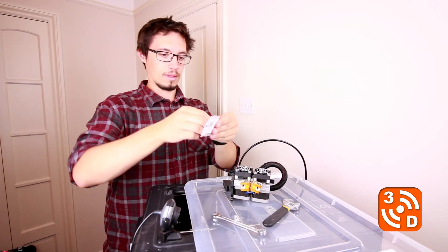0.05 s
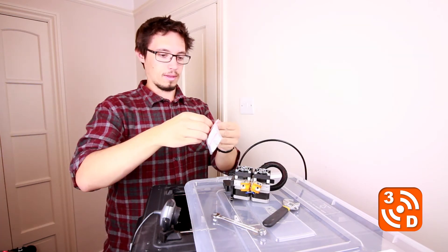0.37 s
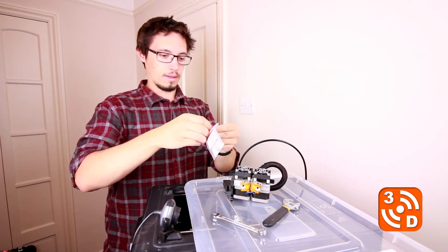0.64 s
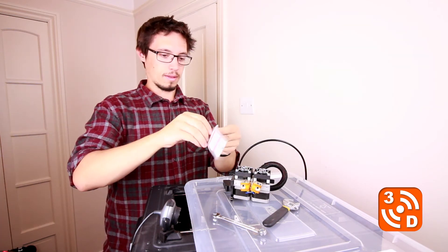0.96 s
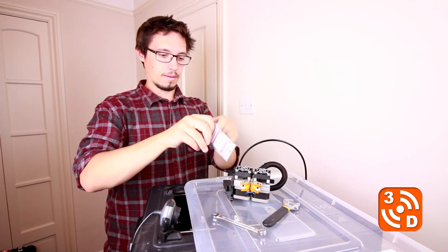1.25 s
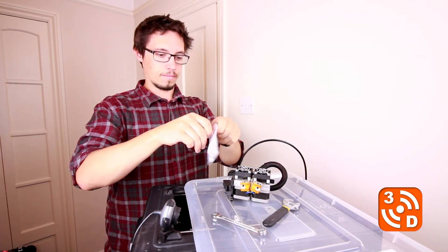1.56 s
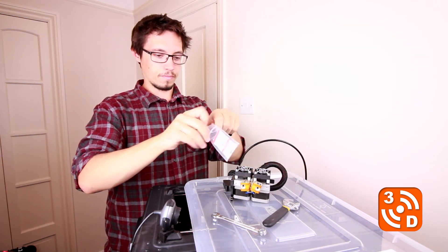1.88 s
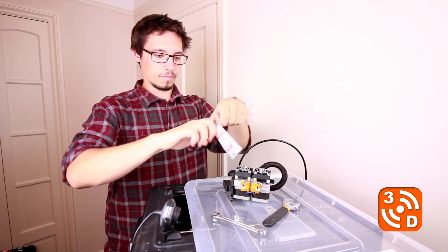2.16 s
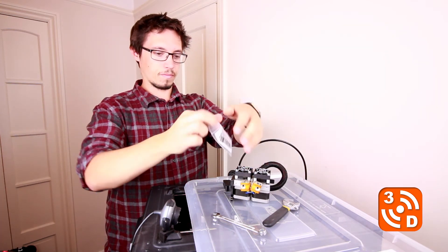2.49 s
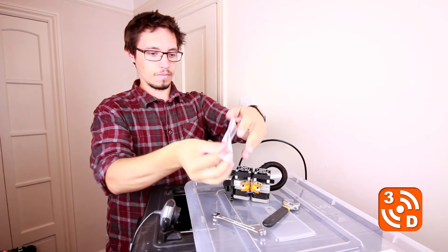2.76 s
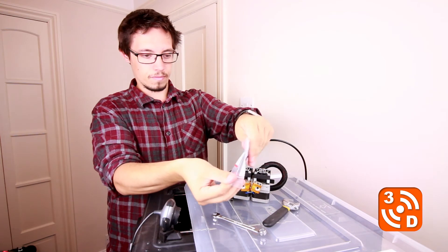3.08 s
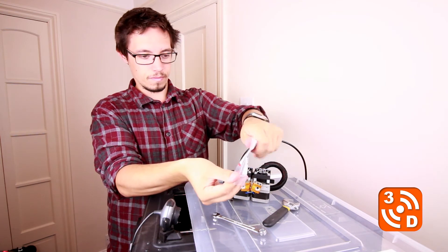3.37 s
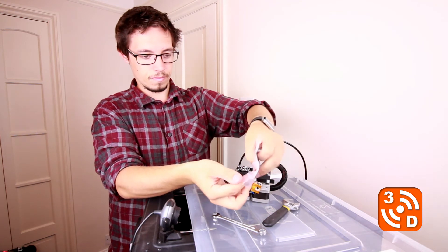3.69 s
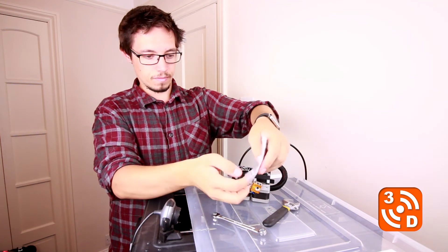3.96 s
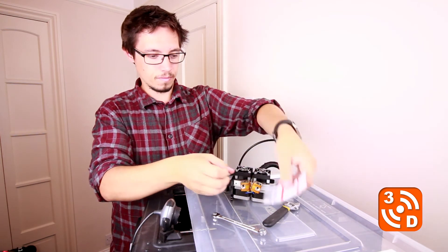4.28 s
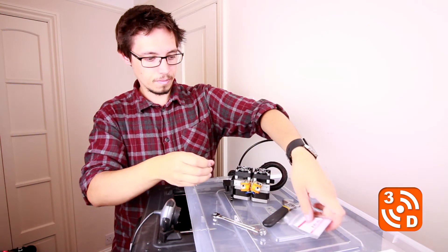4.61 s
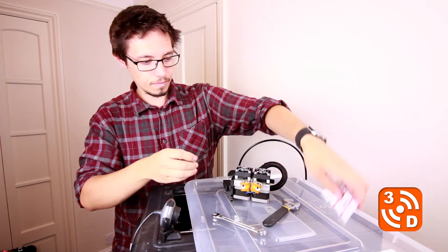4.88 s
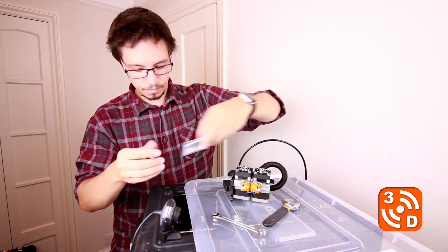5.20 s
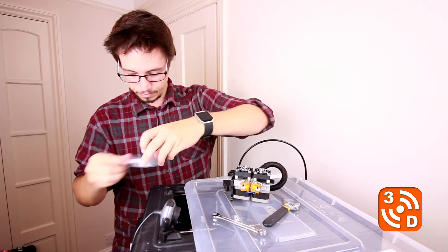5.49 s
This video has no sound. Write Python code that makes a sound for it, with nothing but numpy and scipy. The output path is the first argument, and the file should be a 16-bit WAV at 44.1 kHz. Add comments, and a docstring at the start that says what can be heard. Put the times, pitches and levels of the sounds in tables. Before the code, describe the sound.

A small plastic packet crinkles and snaps as fingers pick it open, then a hand softly bumps a plastic box lid.

```python
"""A small room, one microphone; low rumble and faint hiss throughout.
Fingers pick open a small plastic packet: the film rustles under each stroke, buckles in sharp snaps
and drags in short scrunches. Loudest from 0.9 to 2.6 s; from 1.75 s the packet also jerks with soft thuds.
At 4.7 s the hand with the packet bumps the lid of a plastic storage box, then lifts the packet
and crinkles it again at 5.5 s."""
import sys
import numpy as np
from scipy import signal
from scipy.fft import rfft, irfft, next_fast_len
from scipy.io import wavfile
from scipy.ndimage import map_coordinates

SR = 44100
rng = np.random.default_rng(int(sys.argv[2]) if len(sys.argv) > 2 else 0)


def store_wav(level_fs):
    """Save 16-bit WAV to argv[1]."""
    pcm = np.round(np.clip(np.atleast_2d(level_fs), -1, 1) * 32767)
    wavfile.write(sys.argv[1], SR, pcm.T.astype(np.int16))


N = 249076


def amp(db):
    """Decibels to gain."""
    return 10 ** (np.asarray(db) / 20)


def unit(x):
    """Scale to rms 1."""
    return x / np.sqrt(np.mean(x ** 2) + 1e-20)


def along(points, hz):
    """Interpolate (freq_hz, value) points on a log axis."""
    freqs_hz, values = np.transpose(points)
    return np.interp(np.log(hz + 1), np.log(freqs_hz + 1), values)


def curve(rows):
    """Interpolate (time_s, value) rows, one value per sample."""
    return np.interp(np.arange(N) / SR, *np.transpose(rows))


def wobble(rate_hz):
    """Smooth random curve, rate_hz knots a second."""
    knots = rng.standard_normal(int(N * rate_hz / SR) + 4)
    return map_coordinates(knots, [np.arange(N) * rate_hz / SR])


def filtered(x, response):
    """Apply a frequency response, given as a function of hz."""
    size = next_fast_len(len(x) + SR // 2)
    return irfft(rfft(x, size) * response(np.fft.rfftfreq(size, 1 / SR)), size)[:len(x)]


def coloured(x, spectrum):
    """Shape x by (freq_hz, gain_db) points; rms 1."""
    return unit(filtered(x, lambda hz: amp(along(spectrum, hz))))


def minimum_phase(gain):
    """The most sudden impulse response with this gain."""
    cepstrum = irfft(np.log(np.maximum(gain, 1e-6)))
    half = len(cepstrum) // 2
    fold = np.r_[1, np.full(half - 1, 2), 1, np.zeros(half - 1)]
    return irfft(np.exp(rfft(cepstrum * fold)))


def add(track, start_s, sound):
    """Mix a sound into the track."""
    part = track[max(0, round(start_s * SR)):][:len(sound)]
    part += sound[:len(part)]


# room decay: freq_hz, t60_s
ROOM_DECAY = [(300, 0.57), (800, 0.13), (1400, 0.2946), (2200, 0.2836), (4500, 0.2657), (8000, 0.18),
              (15000, 0.2)]
# room colour: freq_hz, gain_db
ROOM_SPECTRUM = [(200, -2), (500, -4), (1000, 2.5), (1450, 1.5), (2000, -3.5), (2900, 1.5), (4000, -3.5),
                 (5000, -0.5), (9000, -1), (15000, 1)]

def room_tail(build_s=0.0026):
    """Diffuse tail of energy 1: builds as the nearest surfaces reply; the bass lasts longest."""
    hz, t, noise = signal.stft(rng.standard_normal(SR // 2), SR, nperseg=256)
    gain = amp(along(ROOM_SPECTRUM, hz)[:, None] - 60 * t / along(ROOM_DECAY, hz)[:, None])
    tail = signal.istft(noise * gain, SR, nperseg=256)[1]
    tail *= 1 - np.exp(-(np.arange(len(tail)) / SR / build_s) ** 2)
    return tail / np.linalg.norm(tail)


def in_room(x, wet_db):
    """Direct sound plus its own room tail."""
    wet = amp(wet_db) * signal.fftconvolve(x, room_tail())
    return wet + np.pad(x, (0, len(wet) - len(x)))


# background spectra: freq_hz, density_db
RUMBLE_SPECTRUM = [(4, -16), (8, 3), (14, -7.5), (20, -18), (30, -24.5), (48, -27), (70, -35), (120, -33),
                   (200, -88)]
HISS_SPECTRUM = [(60, -80.5), (130, -0.5), (200, 2.5), (290, -0.5), (400, -9), (650, -13), (1000, -13),
                 (1350, -13.5), (2000, -23.5), (3000, -32.5), (8000, -33.5), (16000, -36.5)]
# rumble drift: time_s, gain_db
RUMBLE_DRIFT = [(0, 7.5), (0.7, 2), (1.3, 1), (1.6, 4.5), (3.0, 3.5), (4.2, 0.5), (5.15, 1), (5.64, 10.5)]

def background(rumble_db=-41, hiss_db=-57):
    """Deep, slowly changing rumble and the steady hush of the room."""
    rumble = coloured(rng.standard_normal(N), RUMBLE_SPECTRUM + [(400, -120)])
    hiss = coloured(rng.standard_normal(N), HISS_SPECTRUM)
    return amp(rumble_db + curve(RUMBLE_DRIFT)) * rumble + amp(hiss_db) * hiss


# rubbed film: freq_hz, density_db
FILM_SPECTRUM = [(180, -42.5), (300, -3.5), (689, 4.5), (1480, 6), (1750, 1.5), (2280, -0.5), (2980, -6),
                 (4910, -2), (5430, -4.5), (13800, -12.5), (16000, -19)]
# finger strokes: peak_s, length_s, level_db, taut_db (slack film is dull, taut film bright)
FINGER_STROKES = [(0.1, 0.068, -64, 1), (0.208, 0.041, -63.5, 2), (0.413, 0.036, -52, -0.5),
                  (1.118, 0.05, -55.5, 12), (1.175, 0.038, -60, 10), (1.3, 0.17, -64, 10),
                  (1.51, 0.14, -69.5, -2), (2.06, 0.22, -48, 2), (2.2, 0.067, -44.5, 4.5),
                  (2.35, 0.063, -61, 2), (2.486, 0.067, -47.5, 0.5), (2.64, 0.1, -54.5, -5),
                  (2.914, 0.041, -52.5, -9), (3.005, 0.052, -55.5, 5), (3.127, 0.058, -55, 3.5),
                  (3.22, 0.044, -56, 9), (3.335, 0.043, -57.5, 7), (3.46, 0.36, -66, 0.5),
                  (3.589, 0.042, -50.5, -15), (3.703, 0.091, -45, 0), (3.79, 0.079, -55.5, 6),
                  (3.92, 0.042, -60, 0), (4.06, 0.072, -57.5, 3), (4.2, 0.075, -63.5, 25),
                  (4.287, 0.037, -55, 8), (4.57, 0.11, -60, 1), (4.673, 0.054, -49.5, 1.5),
                  (4.78, 0.098, -55.5, -5), (5.09, 0.11, -67.5, 4), (5.201, 0.06, -66, 5),
                  (5.524, 0.049, -47.5, 10)]

def rustle(creases_per_s=600, spread_db=4, slide_db=-2, pivot_hz=3000, hold_db=-71.5, catch_db=2):
    """Tiny uneven creases tick over the hiss of skin sliding on film; each stroke swells and fades."""
    t = np.arange(N) / SR
    sizes = amp(spread_db * np.minimum(rng.exponential(size=N), 3)) * rng.choice([-1, 1], N)
    ticks = unit(sizes * (rng.random(N) < creases_per_s / SR))
    film = coloured(ticks + amp(slide_db) * rng.standard_normal(N), FILM_SPECTRUM)
    dull = filtered(film, lambda hz: 1 / (1 + (hz / pivot_hz) ** 2))
    bright = film - dull
    out = amp(hold_db) * film  # packet merely held
    for peak_s, length_s, level_db, taut_db in FINGER_STROKES:
        pressure = np.exp(-((t - peak_s) / (length_s / 2)) ** 2)
        out += amp(level_db) * pressure * unit(dull * amp(-taut_db) + bright * amp(taut_db))
    catch = amp(catch_db * wobble(rate_hz=90))  # skin catches and lets go
    return in_room(catch * out, wet_db=-4)[:N]


# base slope of a snap, and the packet's resonances: freq_hz, gain_db
SNAP_SPECTRUM = [(100, -7.5), (300, -5.5), (450, 2.5), (800, 1), (1300, 1), (2400, 1), (5000, 0.5),
                 (11000, -7), (16000, -15)]
PACKET_RESONANCES = [(600, -0.5), (1200, 3.5), (1700, -0.5), (2120, 5), (2600, -3), (3150, -2), (4200, 1.5),
                     (5700, 0), (7400, 0), (8600, 2), (10000, 0)]
# reach of bass_db and bright_db: freq_hz, share
BASS_WEIGHT = [(450, 1), (800, 0.58), (1300, 0)]
BRIGHT_WEIGHT = [(1300, 0.1), (2400, 0.37), (5000, 0.86), (11000, 1.05)]

def snap_colour_db(hz, bass_db, bright_db, facet_hz, air_hz=7440, air_db_per_octave=4, neutral_hz=3700):
    """Spectrum of one snap; a smaller, higher facet cracks more sharply, with more air on top."""
    base_db = along(SNAP_SPECTRUM, hz) + along(PACKET_RESONANCES, hz)
    tone_db = bass_db * along(BASS_WEIGHT, hz) + bright_db * along(BRIGHT_WEIGHT, hz)
    air_shelf = hz ** 4 / (hz ** 4 + air_hz ** 4)
    return base_db + tone_db + air_db_per_octave * np.log2(facet_hz / neutral_hz) * air_shelf


# film buckles: start_s, level_db, facet1_hz, facet2_hz, bass_db, bright_db, room_db
BUCKLES = [(0.1172, -52, 2200, 4400, 18, 7, -3.5), (0.3698, -50.5, 2760, 4300, -1, 1, -9),
           (0.3962, -36.5, 2140, 5260, -19, 7, -2.5), (0.4128, -39, 1430, 2170, -18, 5.5, -2),
           (0.53, -57, 1120, 5470, 20, 7, -12), (0.6673, -50.5, 1300, 4440, -5, 1, -5),
           (0.857, -53.5, 3300, 6000, -17, 3, 1), (0.881, -43.5, 4150, 6420, -16, 5, 1.5),
           (0.893, -41, 4270, 5680, -4, 3, -6), (0.8985, -39.5, 1450, 5930, -20, 0, -12),
           (0.9223, -20.5, 1490, 4720, -17, -4, -6), (1.224, -34.5, 4400, 6050, 7, 17.5, 6.5),
           (1.2273, -17.5, 4600, 6300, -33, -4, -16), (1.3388, -37.5, 2300, 4160, -16, 12, -17),
           (1.3525, -21.5, 4210, 5600, -7, 5, -11), (1.4362, -46, 2120, 4030, -23, -1, -1.5),
           (1.655, -39, 1430, 2260, -8, -34, -7.5), (1.7557, -22, 2100, 2790, -6.5, -11.5, -0.5),
           (1.7583, -17, 1250, 1940, 0, -25, -8.5), (1.7646, -20.5, 2900, 4570, -28, -10.5, -9),
           (1.8151, -17, 1120, 2200, -10, 2, -8), (1.9531, -37, 1900, 2200, 0, -2.5, -15),
           (2.0415, -19.5, 4950, 9400, -5, 1, -10.5), (2.133, -22, 2670, 4450, -1.5, -7.5, -3.5),
           (2.1487, -29, 1180, 2240, 9, -4, -7), (2.1688, -26.5, 2450, 3140, -6, -2, -1.5),
           (2.1807, -24.5, 2420, 4770, 8, 1, -7), (2.1843, -20.5, 1180, 3240, 3.5, -4, -8.5),
           (2.191, -26.5, 2310, 5000, -1, 5, -15), (2.2204, -26.5, 2100, 3040, 3, -0.5, -8),
           (2.227, -32, 1470, 2060, -21, 5, -7), (2.236, -27.5, 2030, 2600, -9, -6, -7.5),
           (2.2627, -27, 1130, 3170, -5.5, 1, -4.5), (2.332, -44, 1200, 1590, 2, -5, -18),
           (2.3877, -30.5, 2680, 3500, -13, -9.5, -8), (2.4604, -31.5, 1540, 2650, -30, -11, -9.5),
           (2.483, -39.5, 1540, 2240, -38, -13, 3), (2.4929, -32.5, 1180, 2360, -25, -21, -4),
           (2.4981, -25.5, 2350, 2600, -15, 0, -7), (2.57, -36.5, 1300, 2060, 12, -4, -3.5),
           (2.5969, -29.5, 1410, 2300, -13, -2.5, -5.5), (2.6307, -36, 4560, 8560, -6, -2, -1),
           (2.696, -44.5, 1510, 2210, -28, -9.5, -1), (2.9428, -44, 1150, 2180, -6, -7, 3),
           (2.953, -33, 1490, 2380, 4.5, -10.5, -16), (3.0924, -48.5, 1460, 4800, -4, -21, -20),
           (3.1579, -35, 1180, 2240, 3.5, -26, -2.5), (3.1617, -32.5, 1120, 4700, 8, 2, -4),
           (3.2419, -34, 1390, 4800, -2, -2, -2.5), (3.259, -36.5, 1150, 2430, -6, -38, -3),
           (3.316, -42.5, 1440, 2450, 2, -11, -1), (3.42, -46, 1350, 5030, 5, 0, 3),
           (3.5208, -48.5, 1150, 2140, -11, -28, -1.5), (3.576, -40, 1060, 4640, 12, -3, -16),
           (3.589, -41, 1370, 2220, -3, 7, 0), (3.6878, -29.5, 4260, 4600, -14, 1, -2.5),
           (3.6974, -28, 1470, 4480, -22, -2.5, -4), (3.7032, -29, 1300, 2200, 6, 2, -6.5),
           (3.956, -49, 1460, 4900, 12, -2, 3.5), (4.8457, -52, 1400, 2350, 2.5, -12, -1),
           (4.9843, -48, 1040, 1800, 1.5, -10, 2.5), (5.1034, -50, 940, 4740, 9, -2, -7),
           (5.4657, -49.5, 1890, 4780, -6.5, -3, -5), (5.4996, -42, 1064, 1950, 3.5, -2.5, -7),
           (5.5041, -34.5, 1110, 1930, 7, 4, -4.5), (5.5087, -41.5, 1320, 1960, -12, -7, -2),
           (5.5303, -39, 1980, 5100, -23, -17, -15), (5.5337, -40.5, 2100, 7440, -4, 9, -12),
           (5.5516, -42, 3920, 4730, -21, -18, -13), (5.568, -40, 4700, 7350, -4, 0, -20)]

def snaps(ring_db=10.5, ring_width=0.12, room_ring_db=4, slip_db=-13, size=2048):
    """A crease flips with one crack, settles in tiny slips and rings the facets on both sides."""
    firm_db, firm_t60_s, doubling_db = -20.5, 0.0098, 28  # softer snaps settle more slowly
    level_window_s = 0.005  # level_db: rms with the direct energy packed into this span
    out, t, hz = np.zeros(N), np.arange(size) / SR, np.fft.rfftfreq(size, 1 / SR)
    for start_s, level_db, facet1_hz, facet2_hz, bass_db, bright_db, room_db in BUCKLES:
        t60_s = firm_t60_s * 2 ** ((firm_db - level_db) / doubling_db)
        push = amp(slip_db - 60 * t / t60_s) * rng.standard_normal(size)
        push[0] = rng.choice([-1, 1])  # the crack
        colour_db = snap_colour_db(hz, bass_db, bright_db, facet2_hz)
        facets = sum(1 / (1 + ((hz / ring_hz - 1) / ring_width) ** 2)
                     for ring_hz in (facet1_hz, facet2_hz))
        ring = minimum_phase(amp(colour_db + ring_db * facets))
        direct = unit(signal.fftconvolve(push, ring)[:size])
        # summed over all directions, the colour is smoother
        diffuse = unit(minimum_phase(amp(colour_db + room_ring_db * facets)))
        gain = amp(level_db) * np.sqrt(level_window_s * SR / size)
        add(out, start_s, gain * direct)
        add(out, start_s, gain * amp(room_db) * signal.fftconvolve(diffuse, room_tail()))
    return out


# film drags: middle_s, half_length_s, pitch_hz, level_db
DRAGS = [(0.404, 0.013, 2020, -55), (1.177, 0.011, 4330, -48.5), (2.022, 0.015, 2426, -34.5),
         (2.961, 0.02, 1450, -42.5), (3.333, 0.017, 2480, -58), (4.074, 0.014, 4660, -58.5),
         (4.284, 0.011, 6230, -60), (4.672, 0.0084, 2360, -47.5), (5.558, 0.0068, 5030, -47)]

def scrunches(relative_width=0.18, skirt_db=-20, slips_per_s=2200):
    """Quick irregular stick-slips swell and fade in one resonance of the stretched film."""
    out, t = np.zeros(N), np.arange(-SR // 10, SR // 10) / SR
    for middle_s, half_length_s, pitch_hz, level_db in DRAGS:
        slips = rng.standard_normal(len(t)) * (rng.random(len(t)) < slips_per_s / SR)
        ring = unit(filtered(slips, lambda hz: resonance(hz, pitch_hz, relative_width * pitch_hz)))
        chatter = ring + amp(skirt_db) * coloured(slips, FILM_SPECTRUM)
        swell = np.exp(-(t / half_length_s) ** 2)
        add(out, middle_s + t[0], in_room(amp(level_db) * chatter * swell, wet_db=-0.5))
    return out


def resonance(hz, centre_hz, width_hz):
    """Two-pole band-pass response, gain 1 at the centre."""
    return 1j * hz * width_hz / (centre_hz ** 2 - hz ** 2 + 1j * hz * width_hz)


# packet jerks: start_s, level_db
JERKS = [(1.755, -32.5), (2.04, -33.5), (2.151, -26.5), (2.184, -31), (2.46, -26), (3.697, -28),
         (5.502, -39)]

def tugs(t60_s=0.073, attack_s=0.00033, gain_db=-8):
    """Each jerk of the packet against the fingers pushes a short, dull puff of air."""
    puff_hz_db = [(25, 20.5), (70, 9.5), (185, 14.5), (330, -13), (900, -53), (2000, -83)]
    out, t = np.zeros(N), np.arange(SR // 5) / SR
    envelope = amp(-60 * t / t60_s) * (1 - np.exp(-t / attack_s))
    for start_s, level_db in JERKS:
        puff = coloured(rng.standard_normal(len(t)), puff_hz_db)
        add(out, start_s, in_room(amp(level_db + gain_db) * envelope * puff, wet_db=-31))
    return out


# lid modes: pitch_hz, mode_db, t60_s
LID_MODES = [(203, -12, .06), (250, 2, 0.081), (304, -1.5, 0.081), (374, -5, 0.061), (504, -11.5, 0.089),
             (620, -5, 0.051), (804, -7.5, 0.075), (1230, -7.5, 0.049), (1690, -17, 0.055),
             (2300, -9.5, 0.037)]
# hand on the lid: start_s, level_db
LID_BUMPS = [(4.738, -31), (4.765, -33)]

def lid(gain_db=-4, attack_s=0.00093, scatter_db=1.1):
    """A soft contact rings the wide plastic lid."""
    out, t = np.zeros(N), np.arange(SR // 2) / SR
    attack = 1 - np.exp(-t / attack_s)
    for start_s, level_db in LID_BUMPS:
        ring = np.zeros(len(t))
        for pitch_hz, mode_db, t60_s in LID_MODES:
            decay = amp(mode_db + rng.normal(0, scatter_db) - 60 * t / t60_s)
            ring += decay * np.sin(2 * np.pi * pitch_hz * t)
        add(out, start_s, in_room(amp(level_db + gain_db) * ring * attack, wet_db=-5))
    return out


def scene():
    """Packet, box and room at one microphone."""
    packet = snaps() + scrunches() + rustle() + tugs()
    return (packet + lid() + background())[None]


def record(dry, dip_hz=1780, dip_width_hz=110, dip_share=0.32, top_hz=15850):
    """The pickup has one narrow dip in the mids and a steep band limit."""
    def response(hz):
        dip = 1 - dip_share * resonance(hz, dip_hz, dip_width_hz)
        return dip / (1 + (hz / top_hz) ** 220)
    return np.array([filtered(channel, response) for channel in dry])


dry = scene()
out = record(dry)
store_wav(out)
```